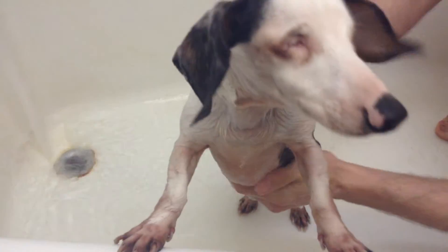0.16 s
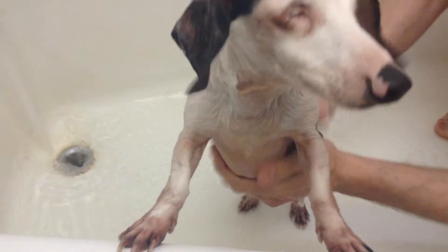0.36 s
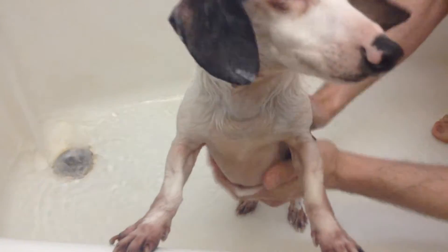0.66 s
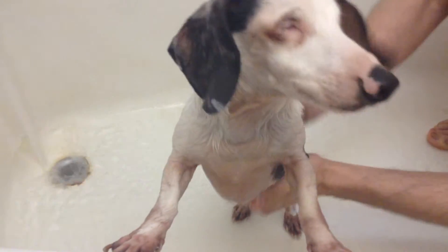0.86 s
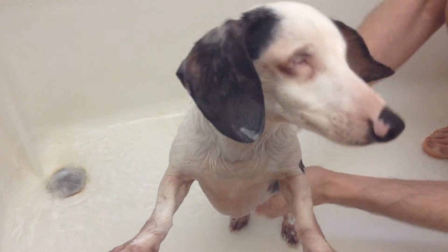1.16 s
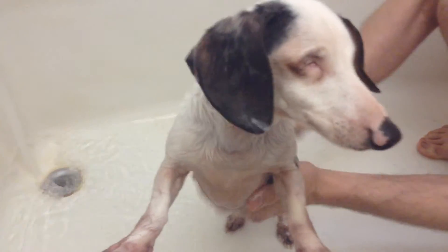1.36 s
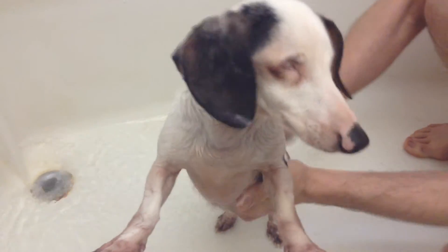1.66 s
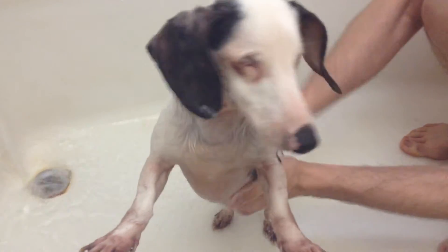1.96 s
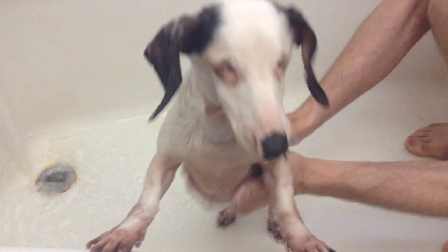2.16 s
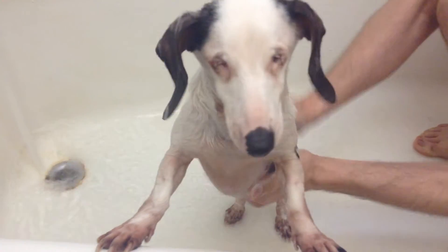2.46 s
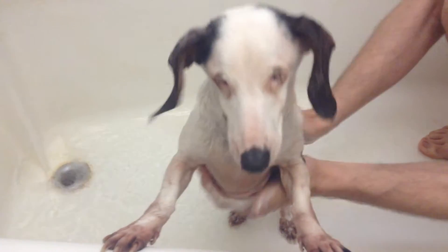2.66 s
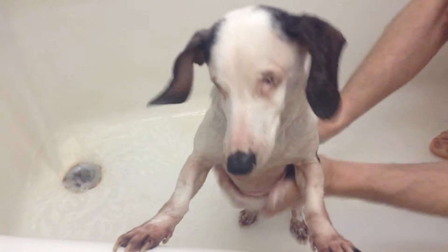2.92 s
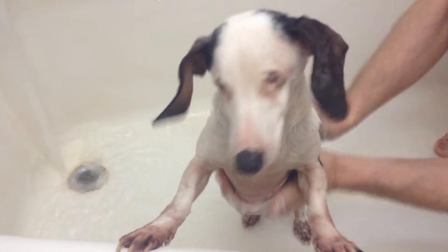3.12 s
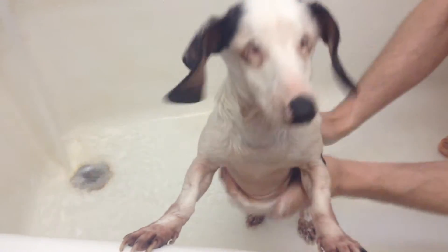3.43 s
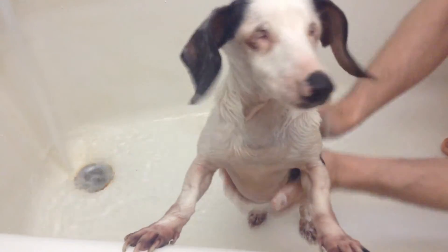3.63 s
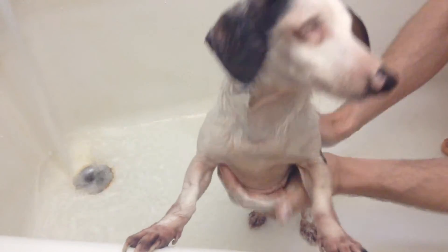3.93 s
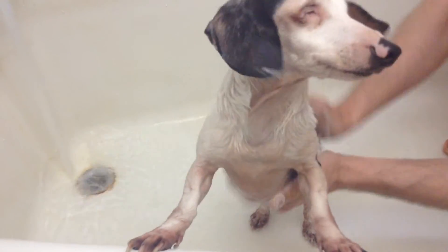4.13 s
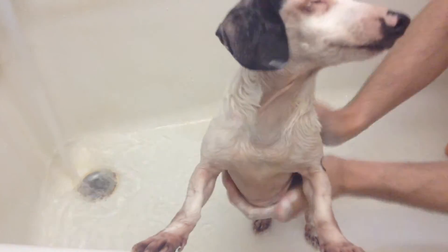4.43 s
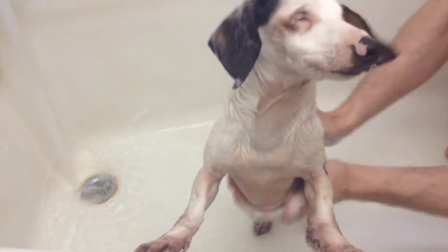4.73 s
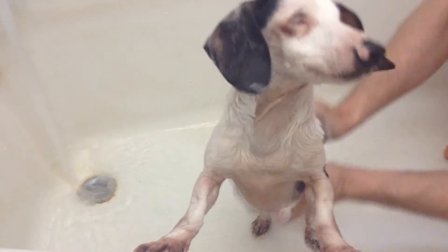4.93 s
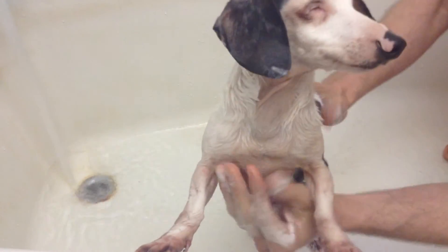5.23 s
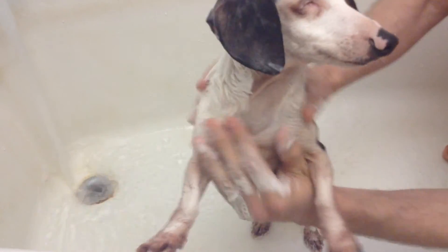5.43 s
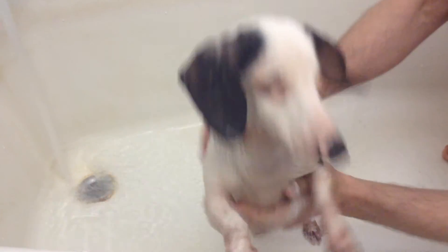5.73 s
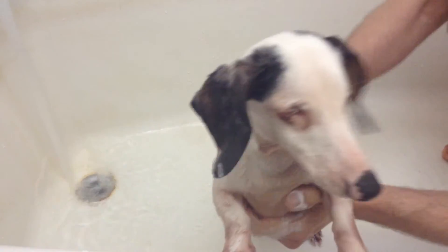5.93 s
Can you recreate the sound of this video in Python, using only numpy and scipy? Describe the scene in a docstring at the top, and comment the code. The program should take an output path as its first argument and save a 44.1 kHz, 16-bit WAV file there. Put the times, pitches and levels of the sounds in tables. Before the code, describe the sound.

Running water splatters onto a bathtub floor with a bright hiss, scattered bubbling and a faint hollow drumming.

```python
"""A bath tap pours onto the floor of a tub in a small tiled bathroom.
From the start the stream breaks into spray and tiny bubbles and keeps the shell ringing, over faint mains hum.
Trapped air glugs, a cavity near the drain rings and water slaps the floor, on and off throughout.
From 0.6 s heavier gushes drum the shell's lowest mode, hardest around 4 s."""
import sys
import numpy as np
from scipy import signal
from scipy.fft import rfft, irfft
from scipy.io import wavfile
from scipy.ndimage import uniform_filter1d

SR = 44100
rng = np.random.default_rng(int(sys.argv[2]) if len(sys.argv) > 2 else 0)


def transcribe(signal):
    """Save signal, clipped to [-1, 1], as a 16-bit WAV file at the path in sys.argv[1]."""
    frames = np.atleast_2d(signal).T
    limited = np.clip(frames, -1, 1)
    pcm = np.round(limited * 32767).astype(np.int16)
    wavfile.write(sys.argv[1], SR, pcm)


N = 268128

# stream strength, as splash at 3.5-8.3 kHz: (time [s], level [dB])
STREAM_LEVEL = [(0.0, -21), (0.61, -21.5), (0.71, -23), (1.49, -20.5), (2.03, -20.5), (2.45, -20),
                (2.49, -23), (2.59, -22), (2.62, -20), (2.64, -21.5), (2.93, -20), (2.96, -24), (3.0, -19),
                (3.05, -24.5), (3.35, -23), (3.61, -22.5), (3.71, -25), (3.74, -19.5), (3.79, -23.5),
                (3.81, -22), (4.01, -22.5), (4.08, -20.5), (4.13, -25), (4.23, -23), (4.25, -25),
                (4.61, -23.5), (4.62, -23.5), (4.67, -23), (4.77, -20), (4.83, -22.5), (4.84, -21.5),
                (4.91, -23), (5.45, -20), (5.57, -20), (5.59, -21), (6.08, -20.5)]
# modes of the tub shell and its air, lowest first: (frequency [Hz], width [Hz], gain [dB])
TUB_MODES = [(227.5, 11.5, 4), (268, 20, 3), (305, 9.9, 4.5), (473.6, 4.6, 11), (584, 26, 3),
             (693, 17, 2.5), (860, 27, 2), (1053, 22, 4), (1360, 9.5, -2.5), (1663, 9.1, 2),
             (1860, 33, 3.5), (1939, 40, 7.5), (2207, 45, 7.5), (2432, 64, 7.5), (2614, 38, 2),
             (2696, 180, 6.5), (3060, 59, 6.5), (3300, 43, 4)]


def from_db(db):
    """Decibels to gain."""
    return 10 ** (np.asarray(db) / 20)


def rms_one(x):
    """Scale to rms 1."""
    return x / np.sqrt(np.mean(x ** 2) + 1e-20)


def butter(x, order, edges_hz, kind):
    """Butterworth filter."""
    return signal.sosfilt(signal.butter(order, edges_hz, kind, fs=SR, output="sos"), x)


def band(x, low_hz, high_hz):
    """One band of x at rms 1."""
    return rms_one(butter(x, 3, [low_hz, high_hz], "band"))


def resonance(x, hz, width_hz):
    """Narrow peak of gain 1."""
    r = np.exp(-np.pi * width_hz / SR)
    feedback = [1, -2 * r * np.cos(2 * np.pi * hz / SR), r * r]
    return signal.lfilter((1 - r * r) / 2 * np.array([1, 0, -1]), feedback, x)


def ring(x, hz, t60_s):
    """Resonator: a unit click starts a decaying sine of height 1."""
    r, w = from_db(-60 / (t60_s * SR)), 2 * np.pi * hz / SR
    return signal.lfilter([0, np.sin(w)], [1, -2 * r * np.cos(w), r * r], x + 1e-18)


def colour(x, spectrum):
    """Minimum-phase filter from rows of (frequency [Hz], gain [dB])."""
    hz, db = np.transpose(spectrum)
    grid_hz = np.maximum(np.fft.rfftfreq(16384, 1 / SR), 10)
    gain = from_db(np.interp(np.log(grid_hz), np.log(hz), db))
    cepstrum = irfft(np.log(gain))
    cepstrum[1:8192] *= 2
    cepstrum[8193:] = 0
    return signal.fftconvolve(x, irfft(np.exp(rfft(cepstrum))))[:N]


def curves(rows):
    """Columns after time, interpolated per sample."""
    times_s, *columns = np.transpose(rows)
    return [np.interp(np.arange(N) / SR, times_s, column) for column in columns]


def drift(rate_hz):
    """Slow random wander, rms about 1."""
    r = np.exp(-40 * np.pi * rate_hz / SR)
    slow = signal.lfilter([1], [1, -2 * r, r * r], rng.standard_normal(N // 20 + 4002))[4000:]
    return np.interp(np.arange(N) / 20, np.arange(len(slow)), rms_one(slow))


def swells(peaks, rise_s, fall_s):
    """Gain with an exponential rise and fall at each peak."""
    t = np.arange(N) / SR
    return sum(from_db(db) * np.exp(np.minimum((t - s) / rise_s, (s - t) / fall_s)) for s, db in peaks)


def clicks(per_s, spread_db):
    """Random clicks, a few much larger than the rest."""
    sizes = from_db(spread_db * np.minimum(rng.exponential(1, N), 4.2)) * rng.choice([-1, 1], N)
    return sizes * (rng.random(N) < per_s / SR)


def random_events(low_hz, high_hz, count):
    """Rows of (time [s], random draw [0-1], stream level about its mean [dB], pitch [Hz])."""
    when, draw, pitch = rng.random((count, 3)).T
    at_s = when * N / SR
    times_s, level_db = np.transpose(STREAM_LEVEL)
    swing_db = np.interp(at_s, times_s, level_db - level_db.mean())
    return zip(at_s, draw, swing_db, low_hz * (high_hz / low_hz) ** pitch)


def surges(per_s, fall_s, rise_s=.0015):
    """Lumps of the breaking stream, soft-limited; mean 0, rms 1."""
    lumps = (rng.random(N) < per_s / SR) * rng.random(N)
    fall, rise = np.exp(-1 / (fall_s * SR)), np.exp(-1 / (rise_s * SR))
    swell = rms_one(signal.lfilter([1], np.convolve([1, -fall], [1, -rise]), lumps))
    swell = np.tanh(swell / 1.6)
    return rms_one(swell - swell.mean())


def fizz(surge_db, births_per_cycle=.07, t60_cycles=14.4):
    """Ringing bubbles of 48 sizes; small ones are born more often, neighbouring sizes in swarms."""
    out = np.zeros(N)
    swarms_db = [2.5 * surges(per_s=40, fall_s=.010) for _ in range(12)]
    for k, hz in enumerate(np.geomspace(140, 17000, 48)):
        swarm_db = swarms_db[k // 4]
        births = clicks(births_per_cycle * hz * from_db(surge_db + swarm_db), spread_db=4.5)
        out += np.sqrt(hz) * rms_one(ring(births * from_db(.49 * swarm_db), hz, t60_cycles / hz))
    return rms_one(out)


def splash():
    """Spray hiss, drop impacts and fizz swell with the stream's surges."""
    # splash colour: (frequency [Hz], gain [dB])
    spectrum = [(15, -84), (25, -53), (158, -22.5), (224, -10.5), (354, -16), (438, -17.5), (573, -9),
                (790, -10.5), (1350, -8.5), (1580, -6), (1810, -11), (2240, -7), (5280, 2.5), (7000, 2),
                (8000, -2.5), (11800, -3.5), (15000, -11.5)]
    # slow band levels: (time [s], gurgle [dB], spatter [dB], mist [dB], boom [dB])
    band_levels = [(0.0, -34, -27, -25, -51), (0.47, -36, -28, -25, -47), (0.73, -37.5, -30, -27, -49.5),
                   (1.73, -35, -27, -24.5, -48), (2.0, -33, -27, -25, -47.5),
                   (2.37, -36.5, -27, -25.5, -48.5), (2.47, -38, -28.5, -26.5, -47),
                   (2.83, -34.5, -27.5, -25, -50), (2.95, -37, -28.5, -26.5, -51),
                   (3.18, -38.5, -31, -29.5, -53), (3.49, -36.5, -29, -27, -49),
                   (3.66, -36, -29.5, -28, -48.5), (3.93, -35.5, -27.5, -25.5, -49),
                   (4.25, -37, -31.5, -29, -49.5), (4.54, -37.5, -30.5, -27.5, -50),
                   (5.16, -35.5, -28, -25.5, -48.5), (5.74, -34.5, -27.5, -24.5, -48.5),
                   (6.08, -34, -28.5, -27, -50)]
    level_db, = curves(STREAM_LEVEL)
    gurgle_db, spatter_db, mist_db, boom_db = curves(band_levels)
    quick_db = level_db - uniform_filter1d(level_db, size=SR // 4)
    surge_db = surges(per_s=60, fall_s=.012)
    spray = from_db(-3.5 + .5 * surge_db) * rng.standard_normal(N)
    drops = from_db(-9) * rms_one(clicks(1000 * from_db(2.9 * surge_db), spread_db=4))
    water = colour(spray + drops + from_db(-2) * fizz(surge_db), spectrum)
    sizzle = from_db(level_db) * band(water, 3496, 8270)
    spatter = from_db(spatter_db + 1.05 * quick_db) * band(water, 1950, 3844)
    mist = from_db(mist_db + quick_db) * band(water, 7700, 15830)
    gurgle = from_db(gurgle_db + .84 * quick_db) * band(water, 430, 2055)
    boom = from_db(boom_db) * band(colour(spray, spectrum), 15, 426)   # spray only: smooth rumble
    return sizzle + spatter + mist + gurgle + boom


def tub(x):
    """Shell resonances, driven by the water."""
    return x + sum((from_db(db) - 1) * resonance(x, hz, width_hz) for hz, width_hz, db in TUB_MODES)


def bathroom(x, t60_s=.19, step_s=.03, spots=8):
    """Dense echoes off hard walls, treble dying faster; they change as the splash point wanders."""
    out, t = np.zeros(N), np.arange(SR // 2) / SR
    place = np.arange(N) / (step_s * SR) % spots
    for k in range(spots):
        echoes = rng.standard_normal(len(t)) * from_db(-60 * t / t60_s) * (t > .003)
        dull = butter(echoes, 1, 18000, "low")
        echoes = dull + (echoes - dull) * from_db(-150 * t)
        distance = np.abs((place - k + spots / 2) % spots - spots / 2)
        crossfade = np.cos(np.pi / 2 * np.minimum(distance, 1))
        out += signal.fftconvolve(x * crossfade, echoes / np.sqrt(np.sum(echoes ** 2)))[:N]
    return out


def hum(hz=119, rms_db=-69.5):
    """Mains hum, level wavering slightly."""
    level = from_db(rms_db + .88 * drift(1.8))
    return np.sqrt(2) * level * np.sin(2 * np.pi * hz * np.arange(N) / SR)


def glugs(tilt_db_per_octave=8):
    """A trapped air pocket rings, rising in pitch, and splits off six weaker bubbles."""
    # large trapped bubbles: (time [s], level [dB], start pitch [Hz])
    large = [(0.0209, -20, 2160), (0.0626, -20.5, 1070), (0.2745, -8, 3200), (0.277, -15, 2260),
             (0.2942, -10, 3200), (0.309, -8.5, 3250), (0.416, -16.5, 1370), (0.4399, -5.5, 3680),
             (0.449, -19, 637), (0.4972, -12, 1200), (0.611, -26, 586), (0.7901, -13, 2820),
             (0.92, -13.5, 3000), (1.107, -22, 1280), (1.246, -23, 666), (1.3344, -17, 1970),
             (1.499, -15, 573), (1.648, -22, 626), (1.6671, -16, 2370), (1.715, -23, 680),
             (1.7254, -15, 2050), (1.7569, -15.5, 1950), (1.7624, -12, 2930), (1.911, -22, 1350),
             (2.045, -20.5, 574), (2.103, -8, 2980), (2.106, -20, 2430), (2.2069, -13, 3160),
             (2.2637, -14, 2800), (2.373, -12, 3040), (2.5175, -19, 1240), (2.5297, -12, 3280),
             (2.6334, -29, 1120), (2.634, -18.5, 650), (2.694, -7, 3040), (2.697, -14, 2250),
             (2.705, -9, 3300), (2.4508, -13, 3080), (4.848, -4, 4800), (2.7112, -15, 1250),
             (2.8685, -11, 3600), (2.9148, -14.5, 2200), (3.767, -12, 2230), (3.767, -11.5, 3220),
             (4.0805, -20.5, 980), (4.1762, -8.5, 2950), (4.418, -23, 650), (4.4642, -15, 1420),
             (4.704, -21, 1480), (4.8464, -14, 2000), (4.9983, -16.5, 1190), (4.999, -17, 590),
             (5.07, -26, 610), (5.145, -17, 1390), (4.005, -25.5, 587), (2.13, -23, 910),
             (5.0803, -14.5, 2650), (5.1417, -16, 2180), (5.2686, -13, 2930), (5.442, -17, 1090),
             (5.488, -22.5, 574), (5.557, -26, 756), (5.5671, -10, 3120), (5.6171, -15, 2150),
             (5.6521, -20, 2240), (5.6984, -14, 2150), (5.7214, -13, 2200), (5.93, -11.5, 2970)]
    weak = [(s, -32 - 6 * draw + tilt_db_per_octave * np.log2(hz / 1000) + swing_db, hz)
            for s, draw, swing_db, hz in random_events(500, 3300, count=30)]
    out, t = np.zeros(N + 8000), np.arange(4000) / SR
    for s, db, hz in weak + large:
        t60_cycles = 22.8 * (hz / 1000) ** .075
        pitch_spread = .34 * (hz / 1000) ** .5
        followers = [(s + .002007 + .022 * late, db - 8 - 6 * soft, hz * (1 + pitch_spread * (high - .35)))
                     for late, soft, high in rng.random((6, 3))]
        for at_s, bubble_db, bubble_hz in [(s, db, hz)] + followers:
            phase = 2 * np.pi * bubble_hz * (t + .96 * t ** 2)
            cycles = t * bubble_hz
            envelope = (1 - np.exp(-cycles / 1.25)) * from_db(-60 * cycles / t60_cycles)
            out[round(at_s * SR):][:len(t)] += from_db(bubble_db) * envelope * np.sin(phase)
    return butter(out[:N], 2, 250, "high")   # small bubbles radiate no bass


def cavity(hz=1576):
    """A cavity by the drain rings as water closes it: a hollow, slightly wavering note, rough with drops."""
    # cavity closures: (peak time [s], level [dB])
    closures = [(0.1, -36), (0.3, -37), (0.41, -39), (0.88, -42), (1.81, -41), (2.13, -35), (2.54, -34),
                (2.66, -33), (2.91, -34), (3.17, -45), (3.25, -42), (3.4, -33), (3.59, -36), (3.91, -35),
                (4.05, -35), (4.2, -35), (4.42, -35), (5.0, -37), (5.15, -35), (5.23, -40), (5.35, -33),
                (5.52, -40), (5.62, -35), (5.77, -29), (5.855, -35), (5.94, -29.5)]
    pitch_hz = hz + 12 * drift(23.7)
    note = np.sqrt(2) * np.sin(2 * np.pi * np.cumsum(pitch_hz) / SR)
    rough = rms_one(resonance(clicks(per_s=900, spread_db=3), hz, width_hz=28))
    return swells(closures, rise_s=.018, fall_s=.02) * (note + from_db(-4.5) * rough)


def slaps(ping_fall_s=.00093, rise_s=.0006):
    """Water hits the tub floor: a ping and a burst of droplets around one pitch."""
    # main slaps: (time [s], level [dB], pitch [Hz])
    strong = [(0.18, -12, 5750), (0.4918, -8.5, 3800), (0.589, -11, 5760), (0.6928, -14, 11300),
              (0.924, -13, 4500), (1.052, -12, 10100), (1.2573, -13, 9350), (1.4676, -10, 5170),
              (1.5648, -15, 9370), (1.6955, -11, 5100), (1.8357, -9, 4770), (1.8644, -17, 4700),
              (2.164, -11, 11900), (2.1824, -19, 5600), (2.2343, -10.5, 3760), (2.2335, -11, 10800),
              (2.2827, -9, 5210), (2.5441, -13, 11300), (2.6499, -21, 5750), (2.819, -12, 4800),
              (2.9033, -12, 11800), (2.987, -11, 6800), (3.108, -11.5, 5430), (3.153, -12.5, 6210),
              (3.3712, -12, 12800), (3.4516, -13, 5000), (3.48, -14, 6900), (3.5486, -9.5, 6740),
              (3.8085, -17, 5470), (3.8473, -19, 3630), (3.9584, -9, 5800), (4.0297, -11, 3960),
              (4.088, -22, 6260), (4.194, -10, 6250), (4.226, -11, 6200), (4.5118, -9.5, 5000),
              (4.625, -8.5, 7900), (4.7618, -13, 6490), (4.8404, -9.5, 4600), (4.853, -14, 5600),
              (4.859, -11.5, 4000), (4.9287, -13, 5000), (5.0537, -11, 6240), (5.182, -13, 12100),
              (5.1826, -8, 5840), (5.5016, -8.5, 7000), (5.5653, -12, 6250), (5.6176, -8.5, 10200),
              (5.709, -11, 9200), (5.7498, -11, 5700), (5.9617, -10, 5830), (5.9634, -12, 9930)]
    weak = [(s, -19 + 2.5 * (2 * draw - 1) + swing_db, hz)
            for s, draw, swing_db, hz in random_events(3700, 9500, count=60)]
    out, t = np.zeros(N + 2000), np.arange(2000) / SR
    for s, db, hz in weak + strong:
        ping = np.sin(2 * np.pi * hz * t) * np.exp(-t / ping_fall_s)
        fall_s = .0049 * (hz / 5000) ** -.11
        envelope = np.exp(-t / fall_s) * (1 - np.exp(-t / rise_s))
        hiss = np.diff(rng.standard_normal(len(t)), prepend=0)
        droplets = envelope * rms_one(ring(hiss, hz, t60_s=4.4 / hz))
        out[round(s * SR):][:len(t)] += from_db(db) * (ping + from_db(-4.5) * droplets)
    return butter(out[:N], 3, 1500, "high")


def thuds():
    """Gushes swell the shell's lowest mode; its pitch wavers at random."""
    # heavy gushes: (peak time [s], level [dB])
    gushes = [(0.64, -45), (1.51, -45), (1.975, -45), (2.3, -45), (2.385, -36), (2.43, -40), (2.62, -39),
              (2.74, -47), (3.74, -34), (4.09, -38), (4.21, -32), (4.35, -41), (5.055, -38), (5.16, -38),
              (5.91, -37)]
    pitch_hz = TUB_MODES[0][0] + 12 * drift(8)
    return swells(gushes, rise_s=.015, fall_s=.014) * np.sin(2 * np.pi * np.cumsum(pitch_hz) / SR)


def scene():
    """Water in the tub, room echoes and hum; mono."""
    water = tub(splash() + glugs()) + slaps() + cavity() + thuds()
    return (water + from_db(-5.5) * bathroom(water) + hum())[None]


def record(dry, low_hz=59.6, stop_hz=15550):
    """Deep bass rolled off, top cut steeply."""
    thin = butter(dry, 2, low_hz, "high")
    return signal.sosfilt(signal.cheby2(16, 60, stop_hz, fs=SR, output="sos"), thin)


dry = scene()
out = record(dry)
transcribe(out)
```